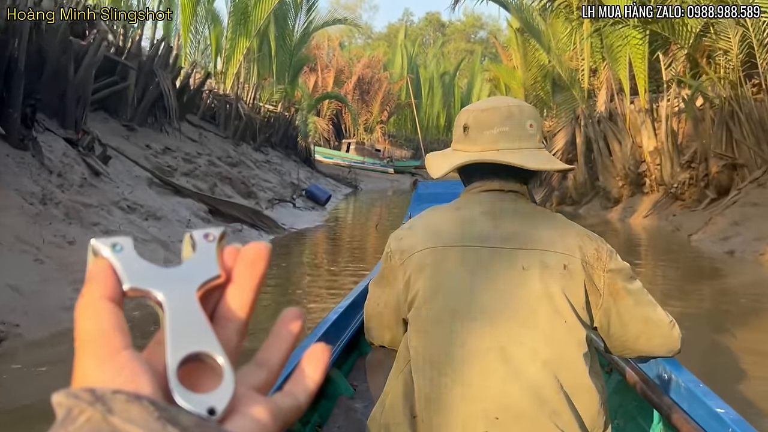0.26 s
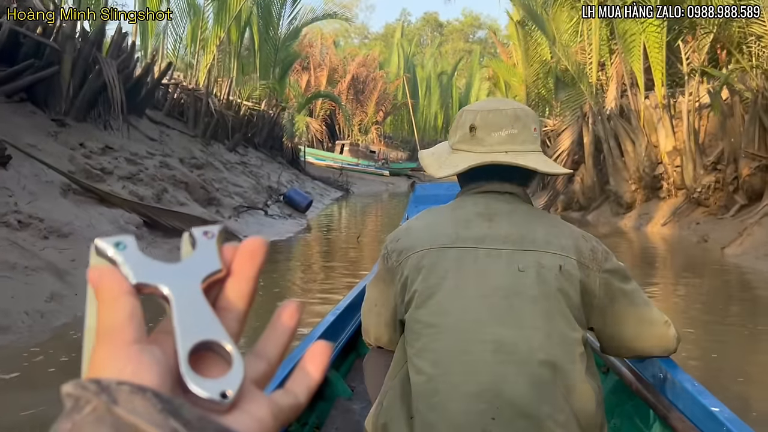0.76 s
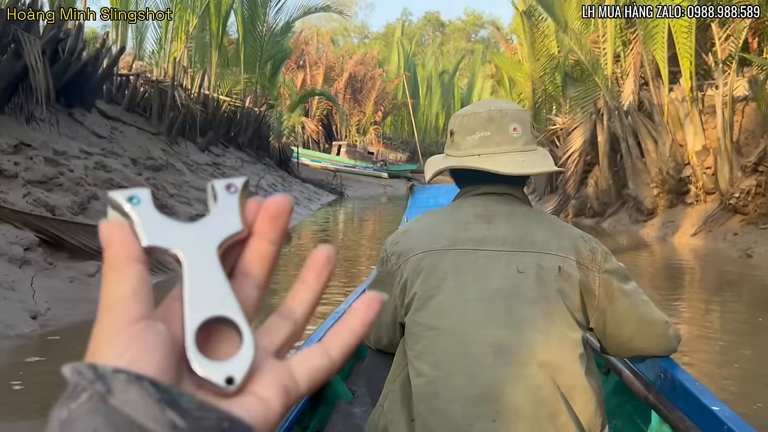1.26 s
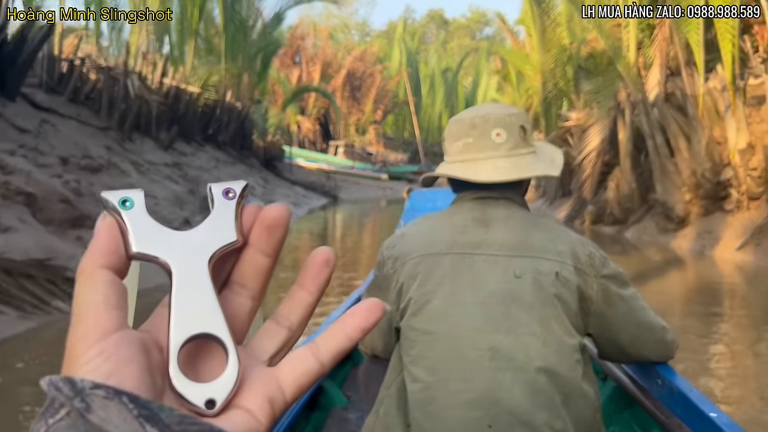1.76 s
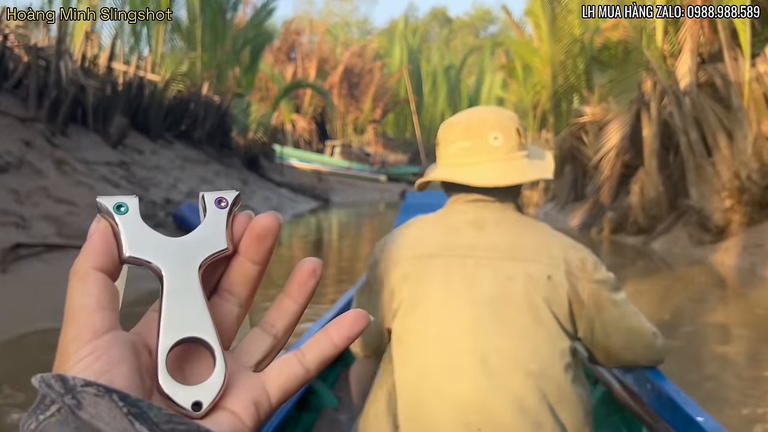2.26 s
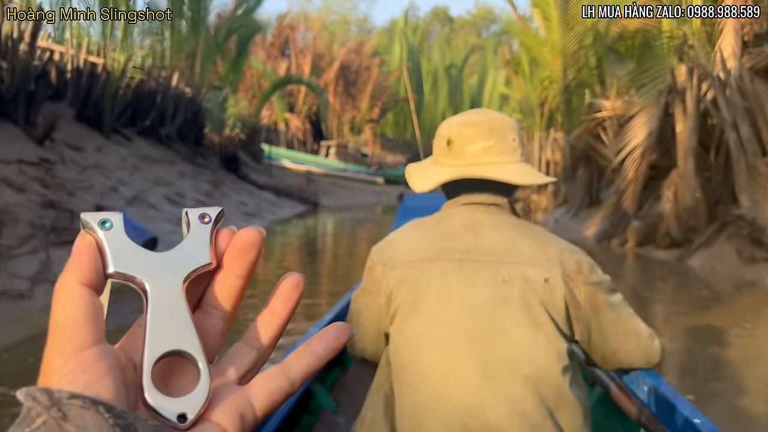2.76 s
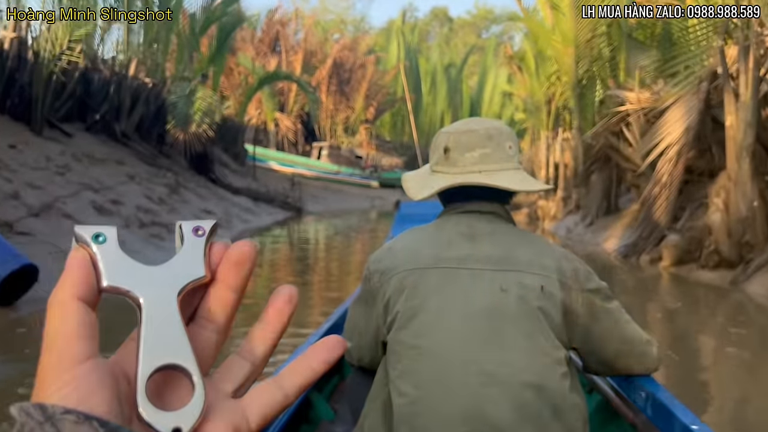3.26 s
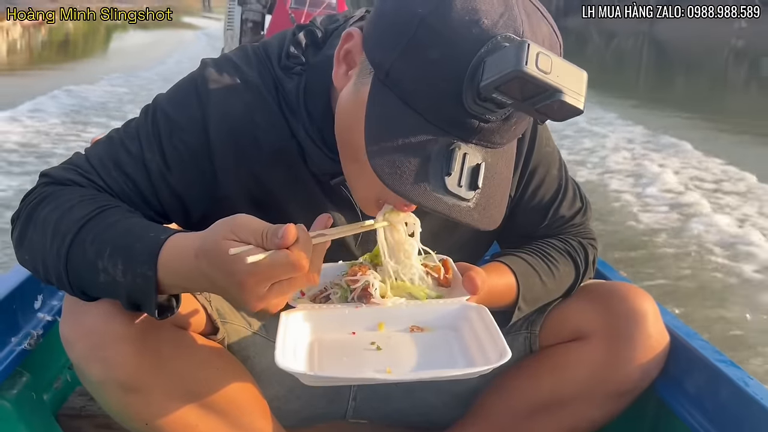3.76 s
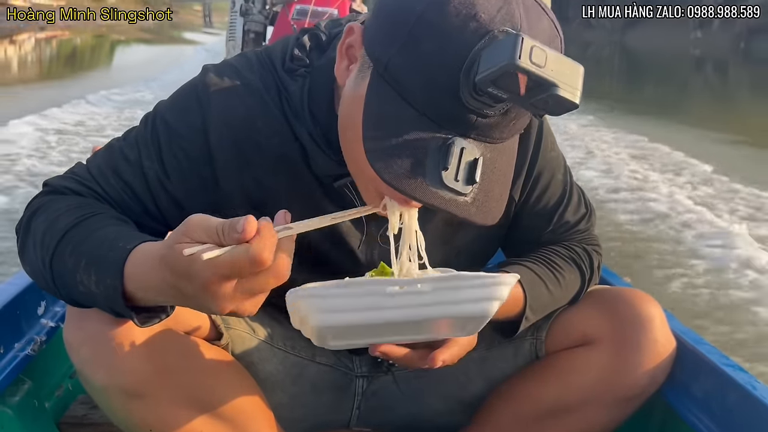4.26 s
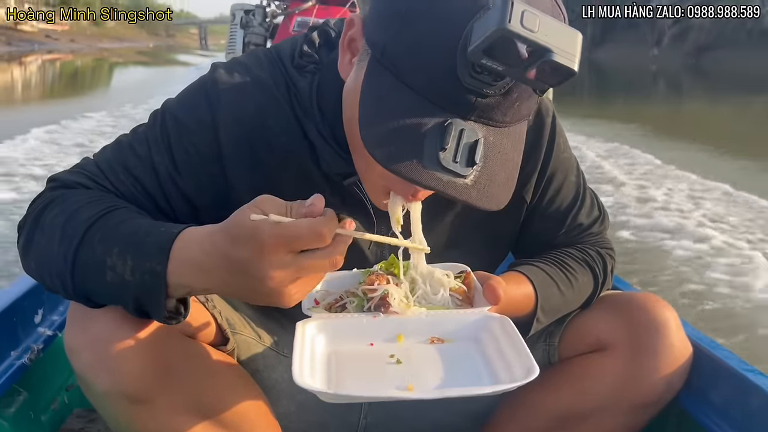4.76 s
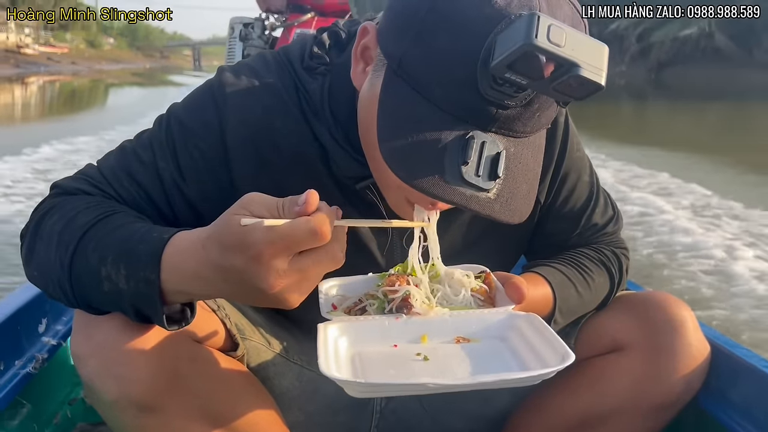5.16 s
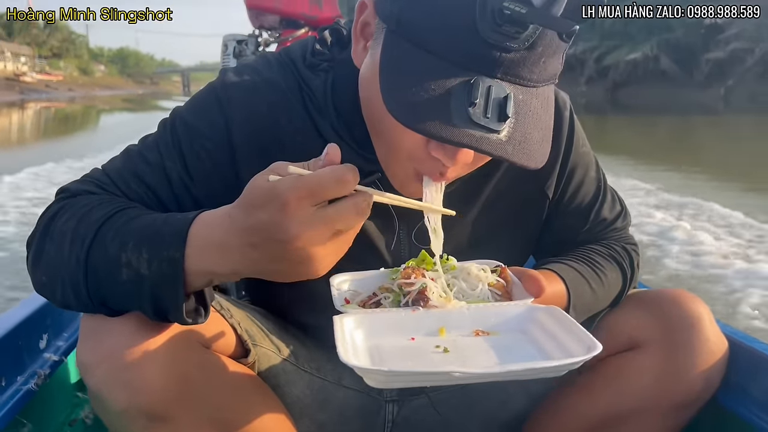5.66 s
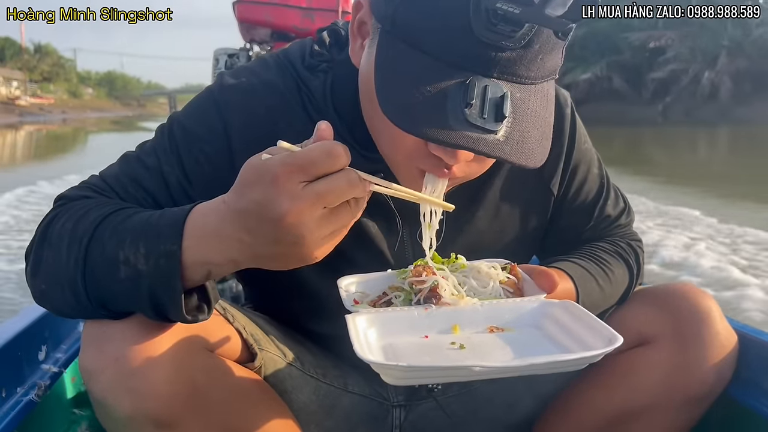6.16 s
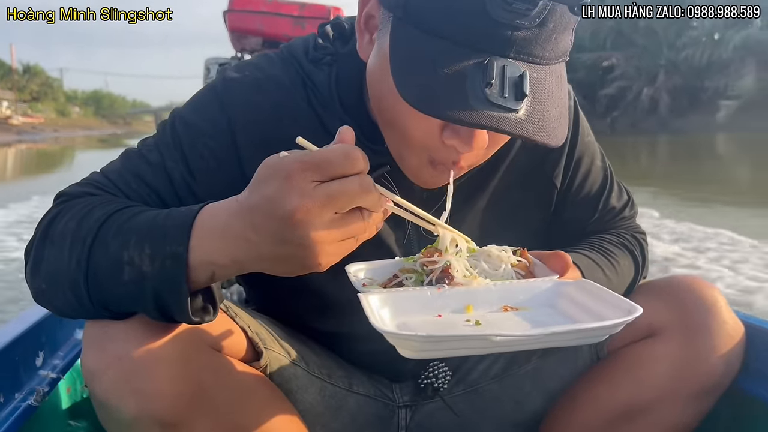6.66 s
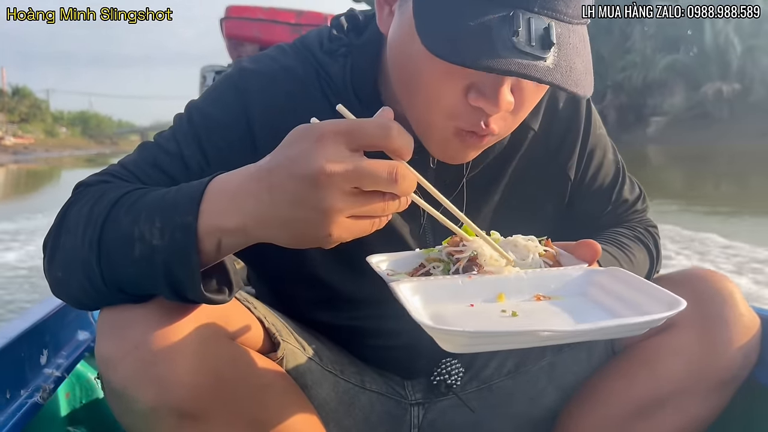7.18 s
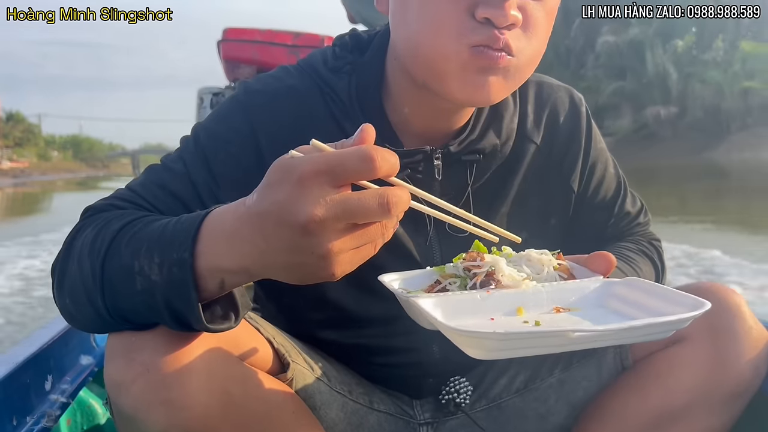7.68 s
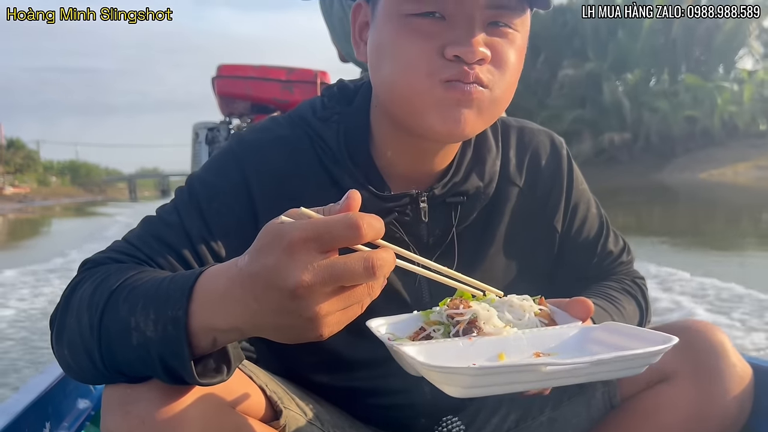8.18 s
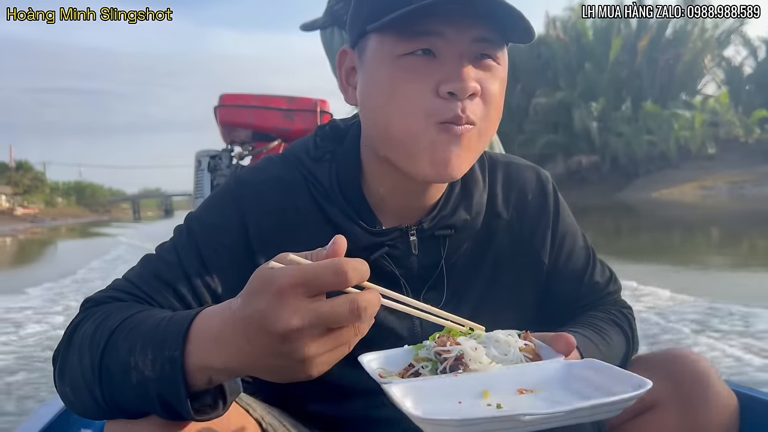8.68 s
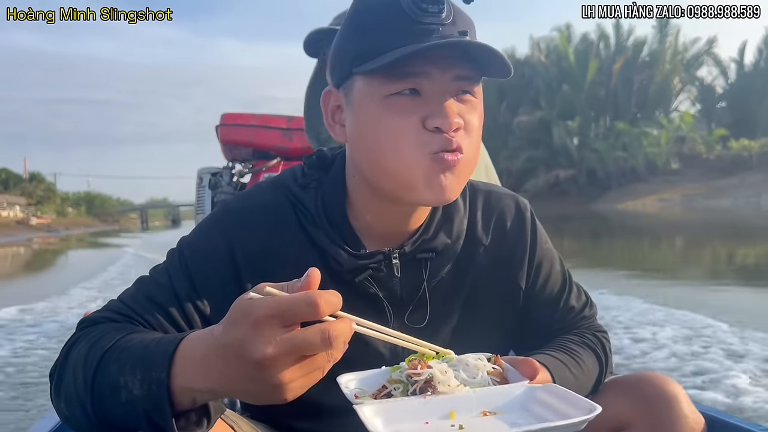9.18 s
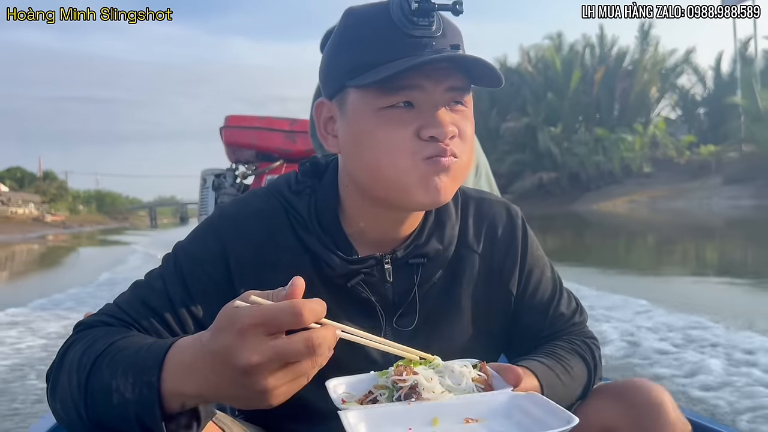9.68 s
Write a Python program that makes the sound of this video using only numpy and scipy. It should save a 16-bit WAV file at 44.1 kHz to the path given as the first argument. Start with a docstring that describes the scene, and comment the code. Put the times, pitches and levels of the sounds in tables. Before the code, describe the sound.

On an open boat, a phone picks up continuous engine blat with water wash and metallic clatter pulsing on every firing. The first shot wavers: strong, easing lower, then pulling harder and higher. A sudden cut brings a second seat near the motor, where the pitch sits higher and holds, with buzzy upper harmonics, a faint shaft whine and fizzing treble, slowly getting slightly softer.

```python
"""A long-tail boat driven by a single-cylinder four-stroke, heard from two seats, one after the other.
Facing the bow, the throttle hunts: 32 firings/s sag to 30.5 and climb to 34; the colour shifts at 1.4-2.4 s.
From 3.47 s, facing the stern, it holds near 36.5 firings/s; the colour shifts at 4.3-6.6 s and levels sink.
Throughout: cosines at multiples of the firing rate boom, casing resonators ring when knocked each cycle,
two sines whine with the shaft, and noise bands of wash, clatter and treble hiss throb with the cycle."""
import sys
import numpy as np
from scipy import signal
from scipy.fft import rfft, irfft, next_fast_len
from scipy.io import wavfile
from scipy.ndimage import uniform_filter1d

SR = 44100
rng = np.random.default_rng(int(sys.argv[2]) if len(sys.argv) > 2 else 0)


def digitize_waveform(pressure):
    """Quantize a signal to 16-bit integers and store it at the path in sys.argv[1].

    Rows of a 2-D input are taken as channels; values are limited to [-1, 1].
    """
    field = np.atleast_2d(pressure).T
    bounded = np.clip(field, -1, 1)
    quanta = np.round(bounded * 32767).astype(np.int16)
    wavfile.write(sys.argv[1], SR, quanta)


N = 437913
SWITCH_S, SWITCH_FADE_S = 3.466, 0.0062  # bow seat to stern seat


def undb(db):
    """Amplitude factor of a level in dB."""
    return 10 ** (np.asarray(db) / 20)


def unit(x):
    """Scale to RMS 1."""
    return x / np.sqrt(np.mean(x ** 2))


def over_hz(table, hz, axis=1):
    """One column of a table, interpolated over log frequency."""
    table = np.array(table, float)
    return np.interp(np.log(hz + 1), np.log(table[:, 0] + 1), table[:, axis])


def ramp(t, span, ends):
    """Straight line across the span, constant outside it."""
    return np.interp(t, span, ends)


def bump(t, centre_s, length_s):
    """Gaussian bell of peak 1."""
    return np.exp(-((t - centre_s) / length_s) ** 2)


def walk(rate_hz, size):
    """Random levels held 1 / rate_hz and smoothed twice; spread near 1."""
    hold = int(SR / rate_hz)
    steps = np.repeat(rng.standard_normal(size // hold + 1), hold)
    return 1.62 * uniform_filter1d(uniform_filter1d(steps, hold), hold)[:size]


def boom(turn, strokes, slow, fast, blend, waver_db, drift_rad):
    """Multiples of the firing rate, each drifting slowly in level and phase over several firings."""
    n = len(turn)
    multiples, slow_levels_db = np.transpose(slow)
    fast_levels_db = np.array(fast)[:, 1]
    tops, places = np.transpose(strokes)
    # a place in the cycle turns the phase by that share from one multiple to the next
    late = np.cumsum(places[np.searchsorted(tops, multiples)])
    lags = late - late[1]
    early = walk(4, n)  # the upper multiples come early or late together
    out = 0
    for k, slow_db, fast_db, lag in zip(multiples, slow_levels_db, fast_levels_db, lags):
        loose = min(k / 8, 1.5)  # the lowest multiples are the steadiest
        db = slow_db + blend * (fast_db - slow_db) + loose * waver_db * walk(4.03, n)
        shift_rad = drift_rad * (loose * walk(9, n) + (k - 2) / 5 * early)
        out = out + undb(db) * np.cos(2 * np.pi * (k * turn - lag) + shift_rad)
    return unit(out)


def casing(t, turn, modes, shift_s, scatter_db):
    """Casing resonances knocked once a cycle, each at its own moment, ring briefly."""
    loose_hz = 3000  # parts above this rattle loosely: noise bursts, never twice the same
    out = 0
    for hz, width_hz, before_db, after_db, place in modes:
        cycle = (turn - place + 1).astype(int)
        strength = undb(scatter_db * rng.standard_normal(cycle[-1] + 1))
        knock = np.diff(cycle, prepend=cycle[0]) * strength[cycle]
        if hz > loose_hz:
            knock = uniform_filter1d(knock, size=150) * rng.standard_normal(len(t))
        resonator = signal.iirpeak(hz, hz / width_hz, SR)
        ring = signal.lfilter(*resonator, signal.lfilter(*resonator, knock))
        out = out + undb(ramp(t, shift_s, (before_db, after_db))) * unit(ring)
    return out


def whine(turn, multiple, db, flutter):
    """A sine locked to the shaft, as from fan fins or gear teeth, fluttering in level and phase."""
    n = len(turn)
    level = np.sqrt(2) * undb(db + 4 * flutter * walk(8, n))
    return level * np.sin(2 * np.pi * multiple * turn + flutter * walk(25, n))


def hiss(turn, low, high, treble_blend, throb, like, levels_db):
    """Rumble, clatter and treble hiss: noise bands that swell once a cycle, each swell its own size."""
    # moment of the main puff: f/Hz, place in the cycle/turns
    throb_place = [(700, -.04), (4000, .025)]
    bands_hz = np.r_[np.geomspace(40, 900, 9), np.geomspace(1100, 16000, 26)]
    n, size = len(turn), next_fast_len(len(turn))
    bins_hz = np.arange(size // 2 + 1) * SR / size
    treble_from_hz = high[0][0][0]
    colour_db = np.where(bins_hz < treble_from_hz, over_hz(low, bins_hz), over_hz(high[0], bins_hz))
    left, other = rfft(rng.standard_normal((2, size))) * undb(colour_db)
    like = np.clip(over_hz(like, bins_hz), 0, 1)
    both = np.array([left, like * left + np.sqrt(1 - like ** 2) * other])
    marks = np.arange(int(turn[-1]) + 2)
    shared = rng.standard_normal(len(marks))
    layers = np.zeros((3, 2, n))  # rumble, clatter, treble
    for hz, peak in zip(bands_hz, np.eye(len(bands_hz))):
        layer = int(hz > 500) + int(hz > 2700)
        place = turn - over_hz(throb_place, hz)
        puff = np.interp(place, marks, .4 * shared + 1.2 * rng.standard_normal(len(marks)))
        main = np.exp(1.25 * (np.cos(2 * np.pi * place) - 1))
        # a weaker swell leads up to the main one
        lead = 0.15 * np.exp(0.5 * (np.cos(2 * np.pi * (place + 0.42)) - 1))
        throb_db = over_hz(throb, hz) + over_hz(throb, hz, axis=2) * puff
        db = (main + lead) * throb_db + 0.98 * walk(2.31, n)
        if layer == 2:
            db = db + treble_blend * (over_hz(high[1], hz) - over_hz(high[0], hz))
        band = irfft(both * np.interp(bins_hz, bands_hz, peak), size)[:, :n]
        layers[layer] += undb(db) * band
    out = 0
    for x, db in zip(layers, levels_db):
        half_second_rms = np.sqrt(uniform_filter1d((x ** 2).mean(0), SR // 2))
        out = out + undb(db) * x / half_second_rms
    return out


def seat(t, speed, start, engine_db, shift_s, blends, whines_db, strokes, slow, fast, blend, case,
         low, high, throb, like, waver_db, drift_rad, flutter, rumble_db):
    """Engine and wash at one seat, all locked to the integral of the firing rate."""
    # brief level changes: t/s, length/s, boom and rumble change/dB, treble hiss change/dB
    wavers = [(6.15, .25, -0.5, -0.7), (8.8, 0.14, -0.7, 1.7)]
    # brief swells of the low rumble: t/s, length/s, gain/dB
    surges = [(1.522, 0.097, 4), (2.596, 0.12, 3.5), (5.45, 0.055, 4)]
    boom_db, clatter_db, treble_db = engine_db
    boom_db = boom_db + sum(db * bump(t, s, length) for s, length, db, _ in wavers)
    treble_db = treble_db + sum(db * bump(t, s, length) for s, length, _, db in wavers)
    surge_db = sum(db * bump(t, s, length) for s, length, db in surges)
    firing_hz = np.interp(t, *np.transpose(speed))
    turn = start + np.cumsum(firing_hz) / SR + firing_hz[0] * (t[0] - speed[0][0])
    tone = undb(boom_db) * boom(turn, strokes, slow, fast, blend, waver_db, drift_rad)
    tone = tone + casing(t, turn + 1, case, shift_s, scatter_db=3.0)
    for multiple, db in zip((34, 48), whines_db):
        tone = tone + whine(turn, multiple, ramp(t, shift_s, db), flutter)
    levels_db = boom_db + rumble_db + surge_db, clatter_db, treble_db
    treble_blend = np.clip(ramp(t, shift_s, blends), 0, 1)
    return tone + hiss(turn + 1, low, high, treble_blend, throb, like, levels_db)


def stereo(x, phase, balance):
    """The phone's stereo: left and right differ in phase and level by frequency."""
    size = next_fast_len(x.shape[1])
    bins_hz = np.arange(size // 2 + 1) * SR / size
    half_phase = np.exp(.5j * np.interp(bins_hz, *np.transpose(phase)))
    half = undb(over_hz(balance, bins_hz) / 2) * half_phase
    return irfft(rfft(x, size) * np.array([half, 1 / half]), size)[:, :x.shape[1]]


def bow_seat(t):
    """Facing the bow: the throttle hunts; effort raises the levels, speed reweights the multiples."""
    # firing rate: t/s, f/Hz
    speed = [(0.0, 32.104), (.33, 32.314), (.62, 31.506), (1.57, 30.548), (1.9, 31.874), (2.5, 33.12),
             (3.46, 33.925)]
    # how hard the engine pulls: t/s, effort/0-1
    effort_table = [(0, 0.96), (.5, 0.12), (1.5, 0), (2.2, 0.93), (2.95, 0.7), (3.2, 0.88), (3.46, 0.8)]
    # boom at low and high speed: multiple of the firing rate, relative level/dB
    slow, fast = [(1, -26), (2, 2.5), (3, -10), (4, 2), (5, -11), (6, -7.5), (7, -22), (8, -13), (9, -15.5),
                  (10, -16.5), (11, -19.5), (12, -33), (13, -35), (14, -24), (15, -17.5), (16, -25),
                  (17, -20.5), (18, -26), (19, -20.5), (20, -32)], [(1, -32), (2, 0), (3, -12.5), (4, -3.5), (5, -3.5), (6, -31.5),
                                    (7, -29.5), (8, -20.5), (9, -11.5), (10, -59), (11, -30), (12, -26.5),
                                    (13, -38), (14, -27), (15, -23), (16, -34), (17, -22), (18, -28),
                                    (19, -28.5), (20, -27.5)]
    # moment each range of multiples speaks: up to multiple, place in the cycle/turns
    strokes = [(4, .72), (5, .4), (99, .78)]
    # casing: f/Hz, width/Hz, level before shift/dB, level after/dB, place in the cycle/turns
    case = [(860, 70, -44, -44, .92), (1045, 40, -38, -38, .97), (4250, 300, -55, -41, .3)]
    # noise of hull and wash: f/Hz, relative level/dB
    low = [(30, -25), (70, -9), (140, -11.5), (280, -17), (500, -21), (700, -13.5), (1050, -13.5),
           (1400, -20), (1750, -19.5), (2050, -19.5), (2450, -24)]
    # treble hiss, two colours to blend, narrow gaps near 10.3 and 13.7 kHz, each: f/Hz, relative level/dB
    high = ([(2500, -26), (3000, -16), (4200, -18.5), (4800, -17.5), (6100, -13), (7300, -19.5),
            (8600, -15), (9500, -21.5), (10300, -33.5), (11400, -19), (12900, -28), (13700, -56),
            (14700, -24), (16000, -41)], [(2500, 0), (3000, -16), (4200, -6), (4800, -11.5), (5900, -8),
            (7400, -15), (8400, -9), (9500, -15.5), (10300, -35), (11600, -19.5), (12900, -26),
            (13700, -46), (14800, -27), (16000, -34)])
    # noise throb: f/Hz, depth/dB per unit swell, scatter/dB per unit swell and puff
    throb = [(100, 0, .5), (700, 3, .8), (2000, 2, 1), (3300, 2, 1), (4200, 5, 3), (5000, 3, 1.5),
             (6000, 4, 2.5), (7300, 2, 1), (8500, 4, 2), (12000, 2, 1.5)]
    # likeness of left and right noise: f/Hz, likeness/0-1
    like = [(60, .97), (300, .85), (700, .7), (2000, .5), (5000, .4), (9000, .55), (10500, .95)]
    # stereo: f/Hz, left lead/rad; f/Hz, left minus right/dB
    phase, balance = [(0, 0), (250, -.2), (380, -1), (600, -2.5), (1000, -4), (2400, -4.7), (9500, -5.1)], [(60, 0), (110, -1.5), (200, -2.5), (380, -2.5), (700, -6.5),
                                         (1290, -4), (2380, -2.5), (4400, 0.5), (8120, -1), (15000, -0.5)]

    effort = np.interp(t, *np.transpose(effort_table))
    # boom, clatter, treble: level at no effort plus what full effort adds
    engine_db = -15 + 4 * effort, -28.5 + 2 * effort, -28 + 2.5 * effort
    blend = ramp(np.interp(t, *np.transpose(speed)), (31.46, 32.81), (0, 1))  # by firing rate, Hz
    sound = seat(t, speed, start=.754, engine_db=engine_db, shift_s=(1.44, 2.4), blends=(0, 0.65),
                 whines_db=((-45, -46), (-48, -49)),  # low, high: before and after the shift
                 strokes=strokes, slow=slow, fast=fast, blend=blend, case=case,
                 low=low, high=high, throb=throb, like=like,
                 waver_db=2, drift_rad=.3, flutter=1.1,
                 rumble_db=-12.5)  # relative to the boom
    return stereo(sound, phase, balance)


def stern_seat(t):
    """Facing the stern: steady speed, levels sinking slowly, some multiples louder before the shift."""
    # firing rate: t/s, f/Hz
    speed = [(3.475, 36.595), (6.7, 36.562), (8, 36.403), (9.93, 36.599)]
    # boom: multiple of the firing rate, relative level/dB
    orders = [(1, -18.5), (2, 1), (3, -7.5), (4, -9.5), (5, -2.5), (6, -6.5), (7, -4), (8, -7), (9, -17.5),
              (10, -11.5), (11, -6.5), (12, -17), (13, -10), (14, -15), (15, -53), (16, -15), (17, -17),
              (18, -12.5), (19, -14), (20, -54), (21, -20), (22, -18.5), (23, -37), (24, -49), (25, -41),
              (26, -23), (27, -23), (28, -18), (29, -25), (30, -21), (31, -57), (32, -22), (33, -36)]
    # moment each range of multiples speaks: up to multiple, place in the cycle/turns
    strokes = [(4, .69), (5, .42), (9, .25), (12, .63), (19, .99), (99, .9)]
    # casing: f/Hz, width/Hz, level before shift/dB, level after/dB, place in the cycle/turns
    case = [(1612, 67, -45.5, -53, .93), (1770, 100, -47, -45.5, 0.089), (2090, 80, -44, -45.5, 0.946),
            (2224, 75, -45.5, -56, 0.93), (2400, 72, -59, -45.5, .1), (5090, 340, -69, -47.5, 0.018)]
    # noise of hull and wash: f/Hz, relative level/dB
    low = [(30, -34), (55, -10.5), (90, -9), (160, -3), (330, -15.5), (670, -6), (870, -12.5), (1040, -9),
           (1400, -16.5), (1750, -13), (1930, -12.5), (2150, -13), (2450, -16)]
    # treble hiss, two colours to blend, narrow gaps near 10.3 and 13.7 kHz, each: f/Hz, relative level/dB
    high = ([(2500, -19), (2950, -10), (3400, -5.5), (4300, -16), (6200, -3.5), (7200, -15), (8300, -13.5),
            (9400, -18), (10300, -59), (11300, -18.5), (13000, -13), (13700, -49), (15000, -26),
            (16000, -39)], [(2500, -9), (2950, -1), (3700, -1.5), (4300, 1), (5000, -3.5), (6900, -6),
            (8300, -1.5), (9400, -4), (10300, -32.5), (11500, -10.5), (13000, -19), (13700, -32),
            (15000, -22), (16000, -27)])
    # noise throb: f/Hz, depth/dB per unit swell, scatter/dB per unit swell and puff
    throb = [(100, 1, .5), (700, 5, .7), (2000, 4, .8), (3000, 3, 1), (3800, 7, 1.5), (5100, 11, 1.5),
             (6800, 5, 1), (8100, 14, 1.5), (9400, 8, 1.5), (12000, 9, 1.5)]
    # likeness of left and right noise: f/Hz, likeness/0-1
    like = [(60, .97), (300, .9), (700, .7), (2000, .5), (5000, .45), (9000, .65), (10500, .95)]
    # stereo: f/Hz, left lead/rad; f/Hz, left minus right/dB
    phase, balance = [(0, 0), (250, .25), (450, .4), (700, 1.1), (1300, 1.2), (9500, 1.1)], [(60, -1.5), (110, 1), (200, -3.5), (380, 0), (700, -0.5),
                                           (1290, 4.5), (2380, 0.5), (4400, 2.5), (8120, 0.5),
                                           (15000, -0.5)]

    shift_s = 4.3, 6.6
    since_s = t - SWITCH_S
    # boom, clatter, treble: first level, sinking in dB/s
    engine_db = -17 - 0.21 * since_s, -30.5 - 0.28 * since_s, -33 - 0.14 * since_s
    early = [(k, db + 2 * (10 <= k <= 14)) for k, db in orders]
    sound = seat(t, speed, start=.262, engine_db=engine_db, shift_s=shift_s, blends=(0.54, 0.94),
                 whines_db=((-47, -38), (-37, -48)),  # low, high: before and after the shift
                 strokes=strokes, slow=early, fast=orders, blend=ramp(t, shift_s, (0, 1)), case=case,
                 low=low, high=high, throb=throb, like=like,
                 waver_db=.7, drift_rad=.13, flutter=.35,
                 rumble_db=-11.0)  # relative to the boom
    return stereo(sound, phase, balance)


def scene():
    """The bow seat, then the stern seat, joined by a short linear crossfade."""
    t = np.arange(N) / SR
    fade_start, fade_end = int(SWITCH_S * SR), int((SWITCH_S + SWITCH_FADE_S) * SR)
    later = np.clip((t - SWITCH_S) / SWITCH_FADE_S, 0, 1)
    out = np.zeros((2, N))
    out[:, :fade_end] += (1 - later[:fade_end]) * bow_seat(t[:fade_end])
    out[:, fade_start:] += later[fade_start:] * stern_seat(t[fade_start:])
    return out


def record(dry):
    """The phone cuts the top: a steep elliptic low-pass at 15750 Hz."""
    return signal.sosfilt(signal.ellip(10, .2, 80, 15750, fs=SR, output="sos"), dry)


dry = scene()
out = record(dry)
digitize_waveform(out)
```